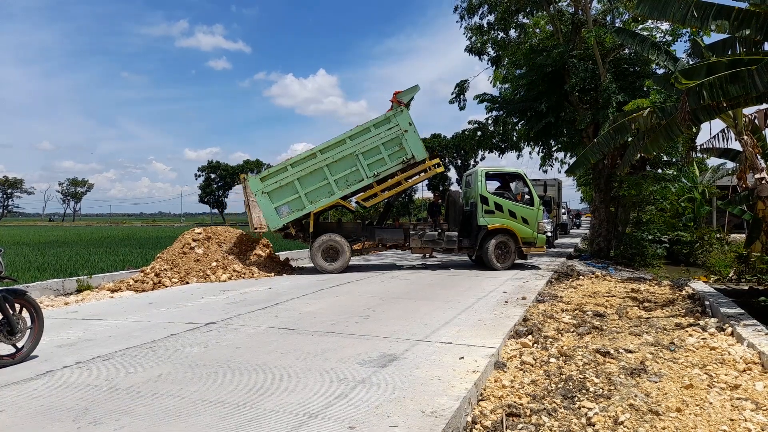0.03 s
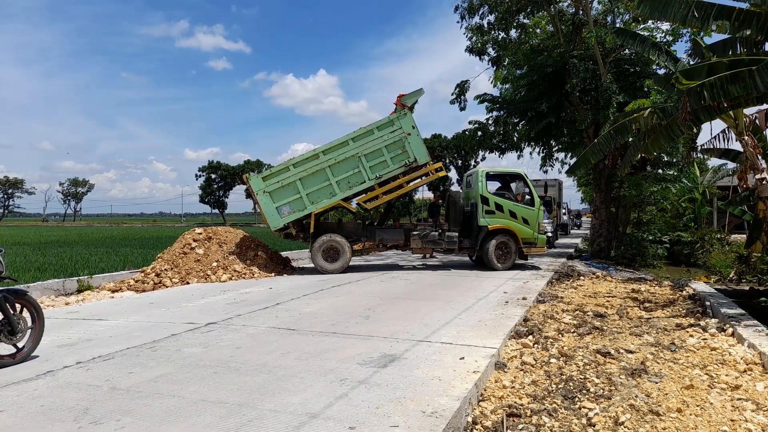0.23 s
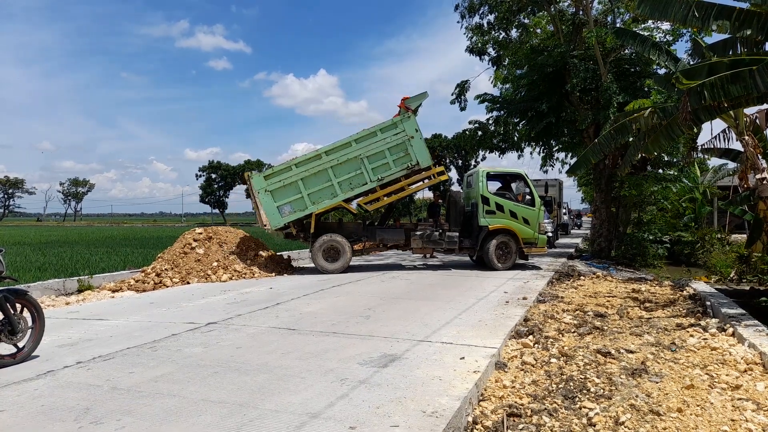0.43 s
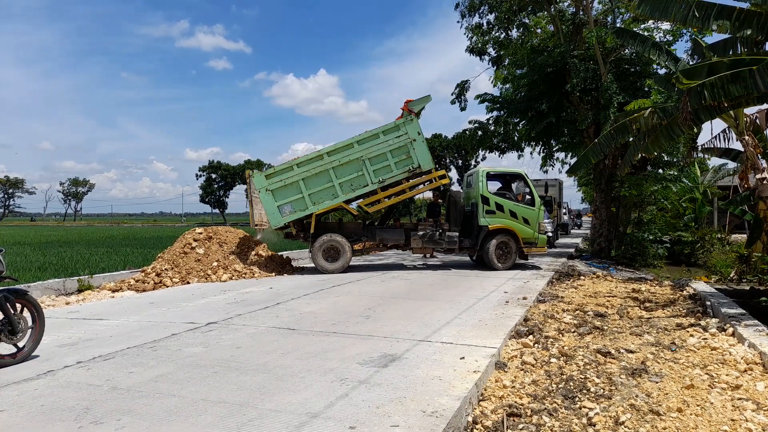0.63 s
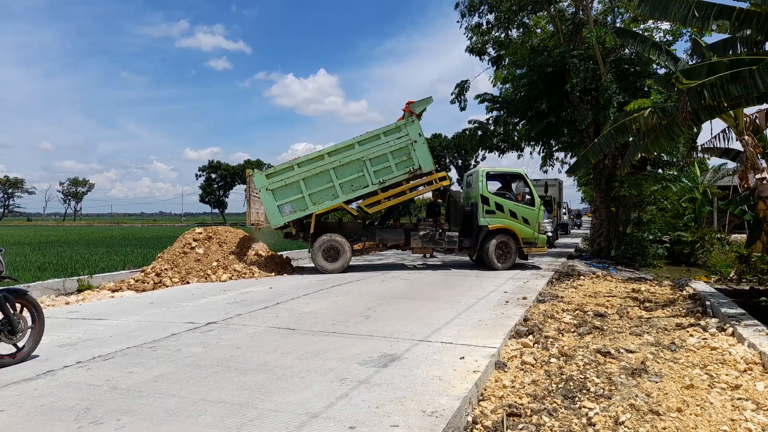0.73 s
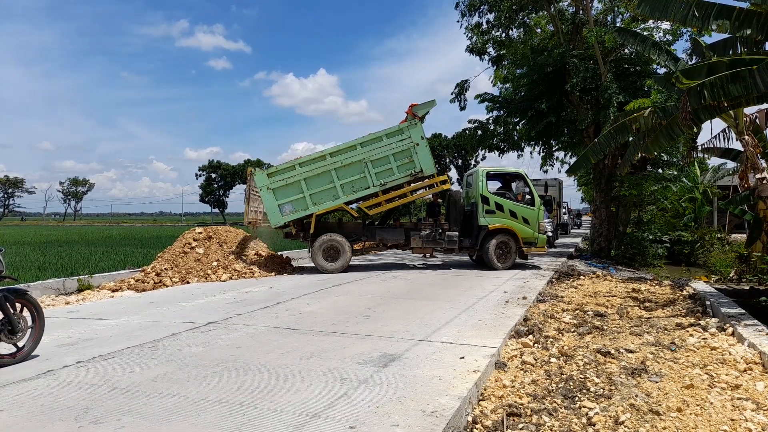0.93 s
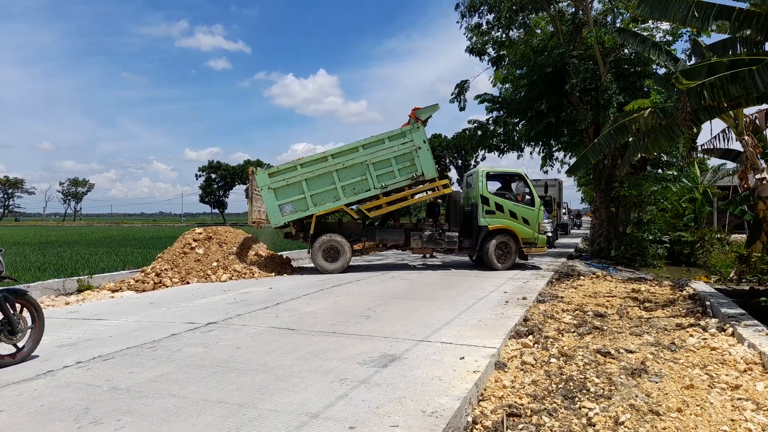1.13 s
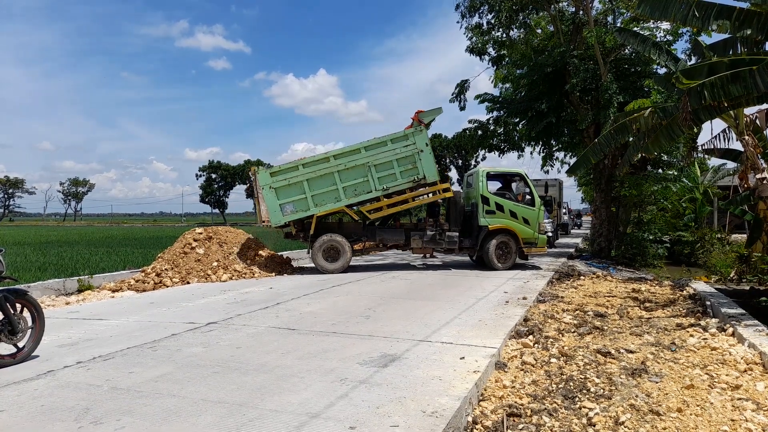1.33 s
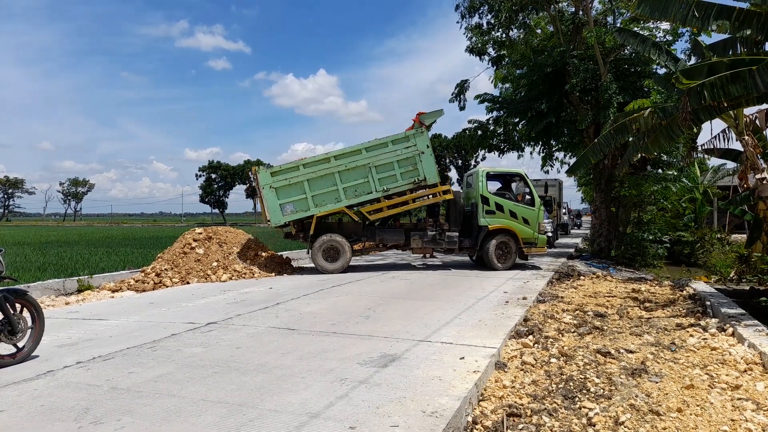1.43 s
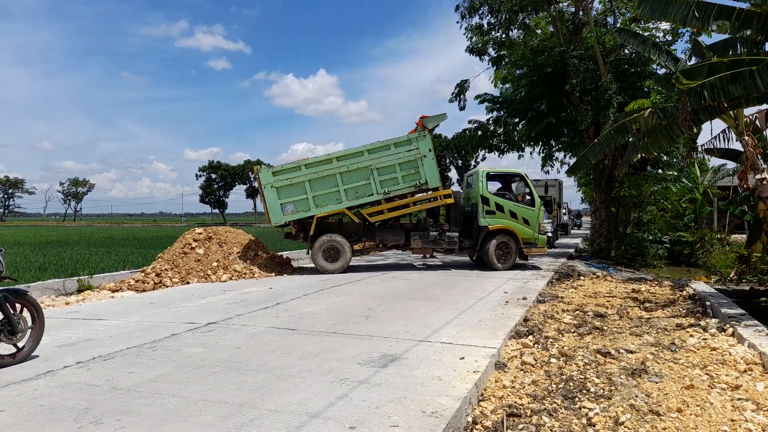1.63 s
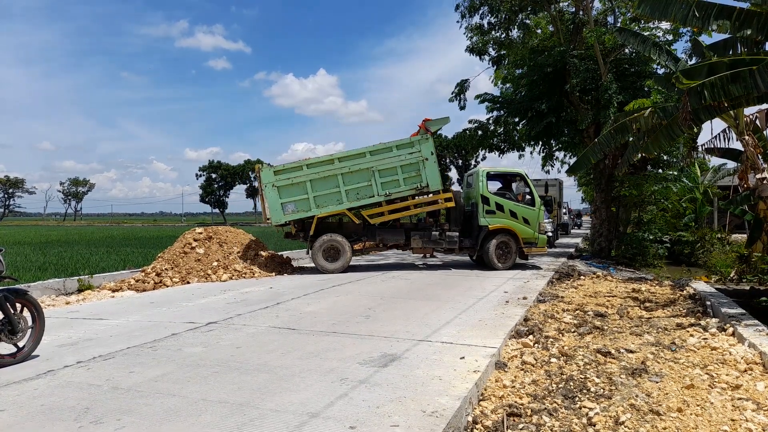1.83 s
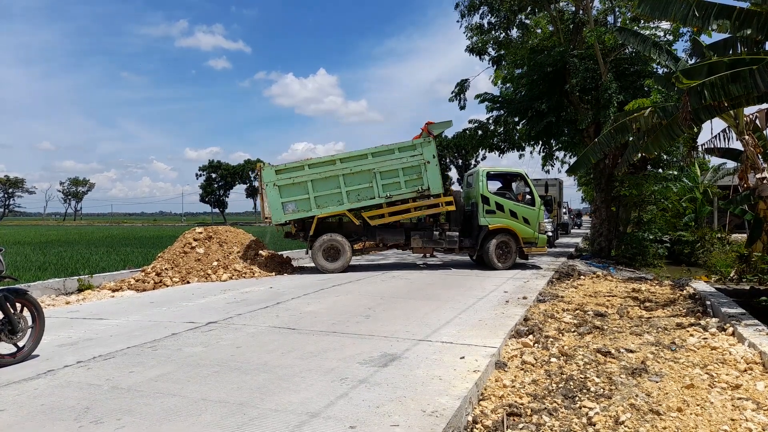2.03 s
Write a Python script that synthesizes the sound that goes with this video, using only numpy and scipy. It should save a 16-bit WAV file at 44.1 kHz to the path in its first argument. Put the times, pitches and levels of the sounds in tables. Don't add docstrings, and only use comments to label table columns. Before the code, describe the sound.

Two hard bangs of a dump truck tailgate, hollow and rattling, above low diesel engine clatter outdoors.

```python
import sys
import numpy as np
from scipy import signal
from scipy.fft import rfft, irfft, next_fast_len
from scipy.io import wavfile
from scipy.ndimage import uniform_filter1d

SR = 44100
rng = np.random.default_rng(int(sys.argv[2]) if len(sys.argv) > 2 else 0)


def attenuation_scalar(level_db):
    decades = np.asarray(level_db, float) / 20
    return 10 ** decades


def master_out(mix):
    frames = np.transpose(np.atleast_2d(mix))
    ceiling = np.clip(frames, -1, 1)
    pcm = np.round(ceiling * 32767).astype(np.int16)
    wavfile.write(sys.argv[1], SR, pcm)


N = 92610

# (time [s], floor boom [dB], wall clang [dB], sheet roar [dB], crack [dB])
CONTACTS = [(.284, -36, -23, -30, -39), (.3, -31, -4, -17.5, -10.5), (.309, -41, -22, -23.5, -30),
            (.327, -19, -22, -22, -15.5), (0.338, -8, -19, -27, -34), (0.355, -17, -28, -26.5, -20.5),
            (.40, -30, -22, -38, -33), (.468, -20.5, -35, -33, -55), (0.541, -29.5, -39, -33, -38),
            (0.682, -24.5, -42, -45.5, -58), (1.594, -70, -59, -29.5, -24), (1.602, -32, -31, -29, -28),
            (1.614, -16.5, -22, -18.5, -16), (1.621, -30, -26, -31.5, -26),
            (1.636, -20.5, -20.5, -23.5, -23.5), (1.676, -18, -18.5, -24, -33), (1.714, -11, -25, -27, -32),
            (1.75, -14, -33.5, -32, -44), (1.785, -20.5, -41, -51, -46), (1.857, -28, -32, -40, -52),
            (1.92, -26.5, -56, -41.5, -53)]
# (pitch [Hz], level [dB], time to fall 60 dB [s])
BED_MODES = [(108, -13, 0.51), (142.6, -3, 0.085), (171.4, -25.5, 0.11), (208.7, 1.5, 0.23),
             (226.95, -1.5, 0.33), (255.1, -4.5, 0.26), (341.2, -5, 0.13), (391.5, -5.5, 0.31),
             (466.1, 0, 0.38), (550, -10.5, 0.28), (588.8, -11, 0.38), (729.3, -3.5, .15), (861, -6, 0.17),
             (997, -14.5, 0.21)]
# (frequency [Hz], level per Hz [dB])
SHEET_COLOUR = [(70, -56), (130, -2), (300, -8), (700, -14.5), (1200, -19.5), (2500, -23.5), (6000, -26.5),
                (16000, -45)]
# (frequency [Hz], time to fall 60 dB [s])
SHEET_T60 = [(100, 0.49), (500, 0.47), (2000, 0.56), (8000, 0.48)]
# (frequency [Hz], level per Hz [dB])
CRACK_COLOUR = [(500, 14.5), (1500, -1), (3000, -14), (4000, 1.5), (5800, -1.5), (7700, 4), (9500, 1),
                (16000, -4)]
# (time [s], level [dB], direction and strength [1])
SLAPS = [
    (0.3391, -9, -1.2),
    (1.6381, -8, 0.66),
]
# (time [s], level [dB], pitch [Hz], beat [Hz], time to fall 60 dB [s])
FLOOR_DRUM = [
    (.325, -11, 128.6, 6.4, 0.59),
    (.462, -18, 125, 4.6, 0.54),
    (0.691, -24, 121.7, 4.4, 0.74),
    (1.603, -7.5, 130.5, 8.6, 0.6),
]
# (time [s], pitch [Hz], level [dB], time to fall 60 dB [s])
CHAIN_TINKS = [
    (.527, 6330, -41, .12),
    (.538, 4820, -42, .1),
    (0.555, 3640, -45, 0.085),
]
# (time [s], level [dB])
BACKGROUND_LEVEL = [ [(0.0, -42.5), (0.41, -44.5), (0.58, -49), (0.81, -49), (1.48, -49.5), (1.78, -46.5),
                 (2.1, -47.5)], ][0]
# (frequency [Hz], level per Hz [dB])
CLATTER_COLOUR = [(200, 5), (500, 0.5), (1300, -1), (2200, -4), (3500, -9.5), (6000, -8), (10000, -10.5),
                  (16000, -7)]
# (pitch [Hz], width [Hz], level [dB])
BLOCK = [(880, 83, -4), (1410, 83, 3), (2490, 100, 0), (3560, 117, 5.5)]
# (pitch [Hz], width [Hz], level [dB])
EXHAUST_PIPE = [(59.4, 27, 8), (83.4, 26, 9), (170, 180, -3)]
# (pitch [Hz], width [Hz], level [dB])
PANELS = [(48.5, 1.9, 5.5), (75.2, 1.17, 4), (116.66, 3.1, 7.5), (178, 5, 3)]
# (frequency [Hz], level per Hz [dB])
FAN_COLOUR = [(150, -9), (300, 4), (700, 0.5), (1500, -2.5), (2050, -10.5), (3000, -10.5), (6000, -14),
              (16000, -33)]
# (frequency [Hz], level per Hz [dB])
TRAFFIC_COLOUR = [(25, -33), (40, -10), (52, 1.5), (85, -1.5), (125, -3.5), (180, -16.5), (250, -18),
                  (500, -36)]
# (frequency [Hz], likeness [1])
ALIKE_FAR = [(60, 1), (130, 0.97), (290, 0.64), (640, 0.71), (1410, 0.089), (3100, 0.15), (6820, -0.22),
             (15000, 0.2)]
# (frequency [Hz], likeness [1])
ALIKE_BED = [(60, 0.95), (300, 0.93), (700, 1), (1400, 0.23), (3000, .55), (7000, 0.15), (15000, 0.73)]
# (frequency [Hz], lead [radians])
LEFT_LEAD = [(300, 0.14), (1000, 0.5), (1500, 0.81), (2400, 3.08), (4000, 2.42), (6200, 2.53), (7700, 7.3),
             (12000, 14.5)]
# (frequency [Hz], level [dB])
PORT_LEFT = [(500, 2), (1300, 1), (3000, 5.5), (6200, 1), (7900, 6.5), (9800, -10.5), (12000, -0.5),
             (15700, -29)]
# (frequency [Hz], level [dB])
PORT_RIGHT = [(500, 3), (1300, 5), (3000, 3.5), (6200, -1), (7400, 5.5), (9000, -23.5), (12000, -5),
              (15700, -17)]

LOW_SIDE_DB = -15
RING_ATTACK_S, FLOOR_TOP_HZ = 0.0014, 250
MODE_SCATTER_DB, DETUNE, WANDER = 2, 0.008, 0.012
CRACK_ATTACK_S, CRACK_T60_S, CRACK_GRAIN_DB = 0.0012, 0.075, 3
SLAP_S = 0.00069
DRUM_PAIR, DRUM_ATTACK_S = 0.78, 0.0084
FIRST_FIRING_S, FIRING_HZ, JITTER_S = 0.033, 20.67, 0.00085
KNOCK_ATTACK_S, KNOCK_DECAY_S, KNOCK_SCATTER_DB = 0.002, 0.015, 1
THUD_LEAD_S, WEAK_THUD_DB, THUD_SCATTER_DB = 0.019, -8, 2.5
PUMP_HZ, PUMP_WIDTH_HZ = 2040, 250
CLATTER_DB, THUD_DB, HUM_DB, PUMP_DB, FAN_DB, TRAFFIC_DB = 4.5, 9.5, 9, -3.5, 2.5, 14
MIC_LOW_HZ, TOP_HZ = 42.4, 15780
CEILING, KNEE = 0.97, 6


def unit(x):
    return x / np.sqrt(np.mean(x ** 2) + 1e-20)


def along(points, hz):
    f, v = np.transpose(points)
    return np.interp(np.log(hz + 1), np.log(f + 1), v)


def filtered(x, response):
    n = x.shape[-1]
    m = next_fast_len(n + SR // 4)
    return irfft(rfft(x, m) * response(np.fft.rfftfreq(m, 1 / SR)), m)[..., :n]


def resonances(rows):
    def response(f):
        total = 0
        for k, (centre, width, db) in enumerate(rows):
            peak = 1j * f * width / (centre * centre - f * f + 1j * f * width)
            total = total + (-1) ** k * attenuation_scalar(db) * peak
        return total
    return response


def rush(colour, alike, size):
    def share(hz):
        turn = np.arccos(np.clip(along(alike, hz), -1, 1)) / 2
        return attenuation_scalar(along(colour, hz)) * np.array([np.cos(turn), np.sin(turn)])
    mid, side = filtered(rng.standard_normal((2, size)), share)
    return unit(np.array([mid + side, mid - side]))


def dying(x, t60):
    hz, t, z = signal.stft(x, SR, nperseg=256)
    fade = attenuation_scalar(-60 * t / along(t60, hz)[:, None])
    return signal.istft(z * fade, SR, nperseg=256)[1][:, :x.shape[1]]


def impulses(times, sizes):
    at = np.clip(np.round(times * SR).astype(int), 0, N)
    return np.bincount(at, sizes, N + 1)[:N]


def widened(bass, shift):
    return bass + attenuation_scalar(LOW_SIDE_DB) * np.array([[1], [-1]]) * np.roll(bass, shift)


def bed_ring(t, boom_db, clang_db):
    hz, level, t60 = np.transpose(BED_MODES)[:, :, None]
    scatter, detune, side = rng.standard_normal((3, len(BED_MODES), 1))[:, :, :]
    knots = rng.standard_normal((len(BED_MODES), 20))
    drift = np.array([np.interp(t * 28, np.arange(20), row) for row in knots])
    pitch = hz * (1 + DETUNE * detune + WANDER * drift)
    phase = 2 * np.pi * np.cumsum(pitch, axis=1) / SR
    blow = np.where(hz < FLOOR_TOP_HZ, boom_db, clang_db)
    size = attenuation_scalar(level + blow + MODE_SCATTER_DB * scatter - 60 * t / t60)
    lead = np.array([1, -1])[:, None, None] * attenuation_scalar(LOW_SIDE_DB) * side
    return (size * np.sin(phase + lead)).sum(axis=1)


def steel_crack(t):
    swell = 1 - np.exp(-t / CRACK_ATTACK_S)
    crack = rush(CRACK_COLOUR, ALIKE_BED, len(t)) * attenuation_scalar(-60 * t / CRACK_T60_S) * swell
    grain = unit(uniform_filter1d(rng.standard_normal(len(t)), size=90))
    return crack * attenuation_scalar(CRACK_GRAIN_DB * grain)


def tailgate():
    out = np.zeros((2, N + SR))
    t = np.arange(SR * 2 // 3) / SR
    short = t[:SR // 6]
    rise = 1 - np.exp(-t / RING_ATTACK_S)
    for s, boom_db, clang_db, roar_db, crack_db in CONTACTS:
        start = round(s * SR)
        ring = bed_ring(t, boom_db, clang_db)
        roar = dying(rush(SHEET_COLOUR, ALIKE_BED, len(t)), SHEET_T60)
        out[:, start:start + len(t)] += rise * (attenuation_scalar(-7.5) * ring + attenuation_scalar(roar_db) * roar)
        out[:, start:start + len(short)] += attenuation_scalar(crack_db) * steel_crack(short)
    return out[:, :N]


def gate_slaps():
    t = np.arange(N) / SR
    out = np.zeros(N)
    for s, db, way in SLAPS:
        u = (t - s) / SLAP_S
        out += way * attenuation_scalar(db) * (1 - (u / 2) ** 2) * np.exp(-0.25 * u ** 2)
    return out


def floor_drum():
    out = np.zeros(N + 2 * SR)
    t = np.arange(SR) / SR
    swell = 1 - np.exp(-t / DRUM_ATTACK_S)
    for s, db, hz, beat_hz, t60 in FLOOR_DRUM:
        beat = np.cos(2 * np.pi * beat_hz * (t - DRUM_ATTACK_S))
        pair = (1 + DRUM_PAIR * beat) / (1 + DRUM_PAIR)
        start = round(s * SR)
        out[start:start + SR] += attenuation_scalar(db - 60 * t / t60) * swell * pair * np.sin(2 * np.pi * hz * t)
    return out[:N]


def chain():
    t = np.arange(N) / SR
    out = np.zeros(N)
    for s, hz, db, t60 in CHAIN_TINKS:
        out += (t > s) * attenuation_scalar(db - 60 * np.abs(t - s) / t60) * np.sin(2 * np.pi * hz * t)
    return out


def diesel_clatter(fire):
    t = np.arange(SR // 8) / SR
    shape = (1 - np.exp(-t / KNOCK_ATTACK_S)) * np.exp(-t / KNOCK_DECAY_S)
    sizes = attenuation_scalar(KNOCK_SCATTER_DB * rng.standard_normal(len(fire)))
    knock = unit(signal.fftconvolve(impulses(fire, sizes), shape)[:N])
    block = resonances(BLOCK)
    return unit(filtered(knock * rush(CLATTER_COLOUR, ALIKE_FAR, N), lambda f: 1 + np.abs(block(f))))


def exhaust_thuds(fire):
    weak = np.arange(len(fire)) % 2
    sizes = attenuation_scalar(WEAK_THUD_DB * weak + THUD_SCATTER_DB * rng.standard_normal(len(fire)))
    puffs = impulses(fire - THUD_LEAD_S, sizes)
    pipe = resonances(EXHAUST_PIPE)

    def response(f):
        low_cut = (f / 46) ** 4 / (1 + (f / 46) ** 4)
        return pipe(f) * low_cut / (1 + 1j * f / 150) ** 2
    return widened(unit(filtered(puffs, response)), SR // 250)


def panel_hum():
    panels = resonances(PANELS)
    hum = unit(filtered(rng.standard_normal(N), lambda f: panels(f) * np.abs(panels(f))))
    return widened(hum, N // 3)


def oil_pump():
    oil = resonances([(PUMP_HZ, PUMP_WIDTH_HZ, 0)])
    return unit(filtered(rush(FAN_COLOUR, ALIKE_FAR, N), lambda f: oil(f) ** 2))


def fan():
    return rush(FAN_COLOUR, ALIKE_FAR, N)


def far_traffic():
    return rush(TRAFFIC_COLOUR, ALIKE_FAR, N)


def idle_and_traffic():
    k = np.arange(46)
    fire = FIRST_FIRING_S + k / FIRING_HZ + JITTER_S * rng.standard_normal(len(k))
    mix = attenuation_scalar(CLATTER_DB) * diesel_clatter(fire) + attenuation_scalar(THUD_DB) * exhaust_thuds(fire)
    mix = mix + attenuation_scalar(HUM_DB) * panel_hum() + attenuation_scalar(PUMP_DB) * oil_pump()
    mix = mix + attenuation_scalar(FAN_DB) * fan() + attenuation_scalar(TRAFFIC_DB) * far_traffic()
    s, db = np.transpose(BACKGROUND_LEVEL)
    return attenuation_scalar(np.interp(np.arange(N) / SR, s, db)) * mix


def scene():
    def lead(hz):
        return np.exp(0.5j * along(LEFT_LEAD, hz) * np.array([[1], [-1]]))
    slams = filtered(tailgate() + gate_slaps() + floor_drum(), lead)
    return slams + chain() + idle_and_traffic()


def band_limit(x):
    return signal.sosfilt(signal.butter(12, 15780, fs=SR, output="sos"), x)


def record(dry):
    def port_colour(hz):
        low_cut = hz ** 2 / (hz ** 2 + MIC_LOW_HZ ** 2)
        return attenuation_scalar([along(PORT_LEFT, hz), along(PORT_RIGHT, hz)]) * low_cut
    ports = filtered(dry, port_colour)
    rounded = ports / (1 + np.abs(ports / CEILING) ** KNEE) ** (1 / KNEE)
    mix = filtered(rounded, lambda hz: hz < TOP_HZ)
    return band_limit(mix)


dry = scene()
out = record(dry)
master_out(out)
```